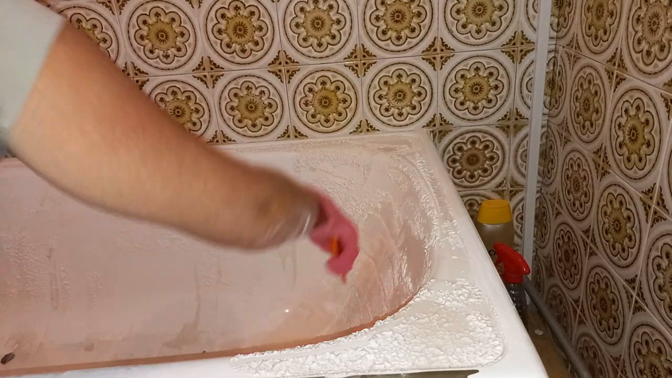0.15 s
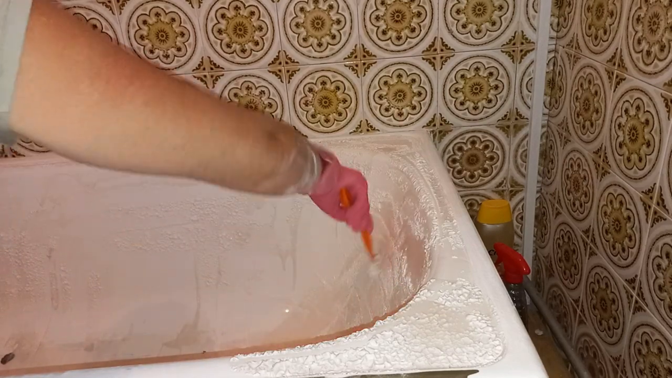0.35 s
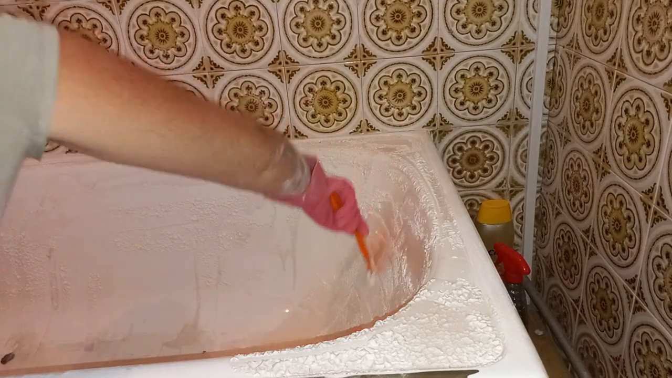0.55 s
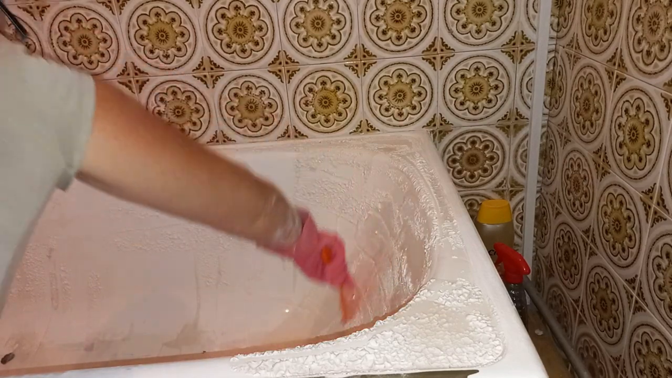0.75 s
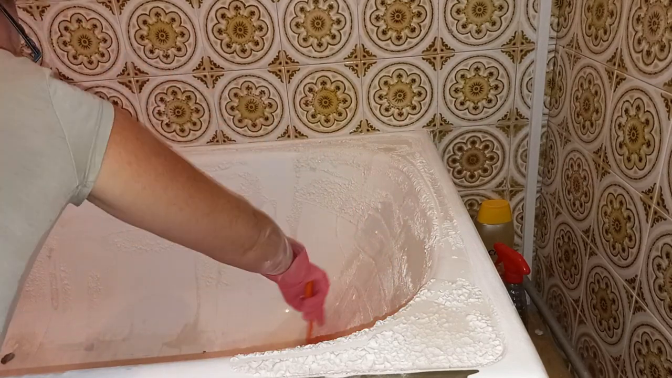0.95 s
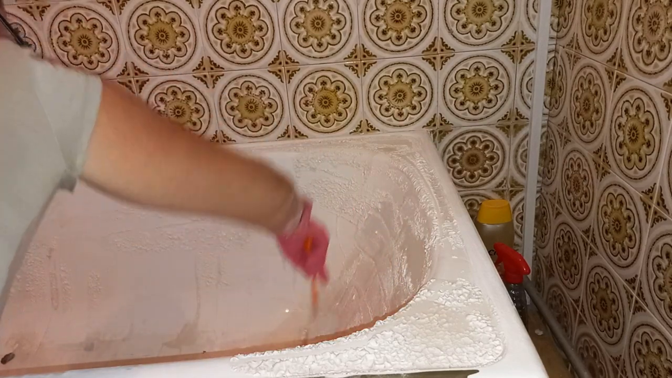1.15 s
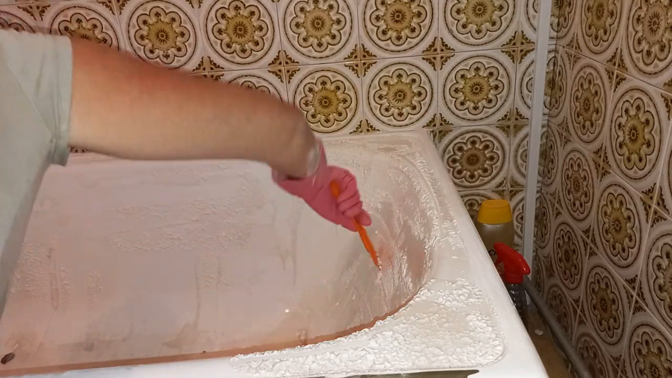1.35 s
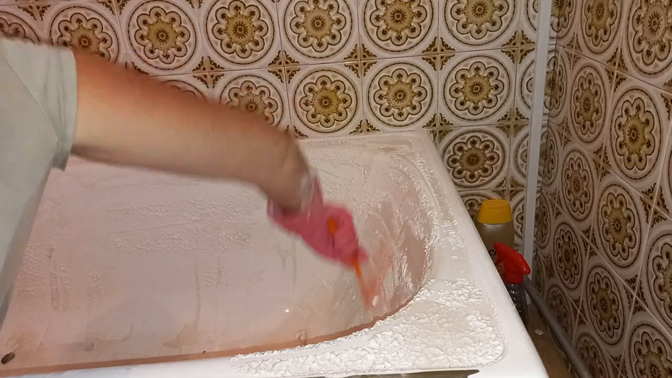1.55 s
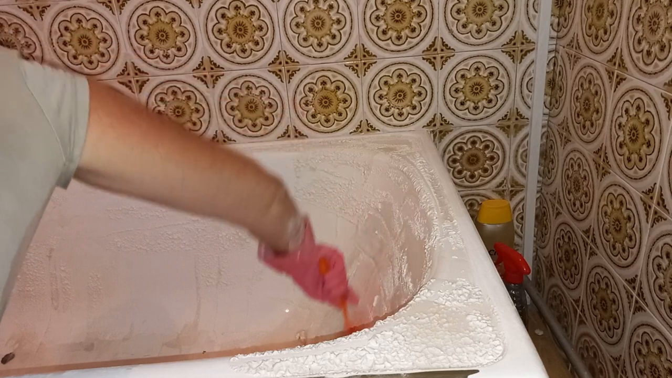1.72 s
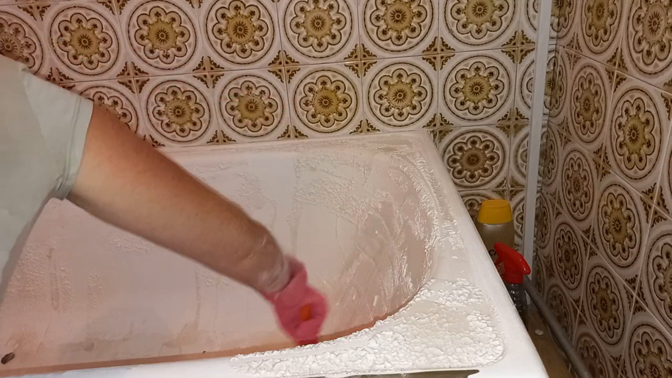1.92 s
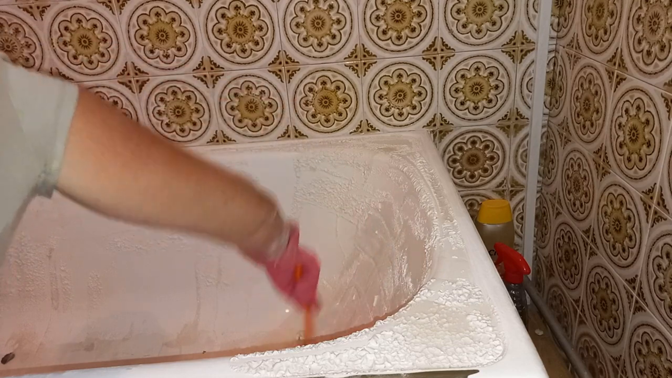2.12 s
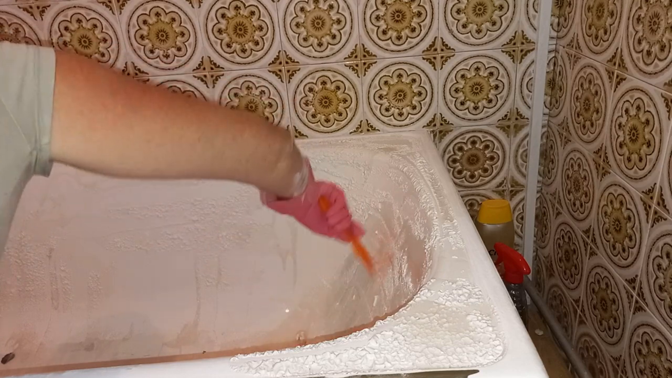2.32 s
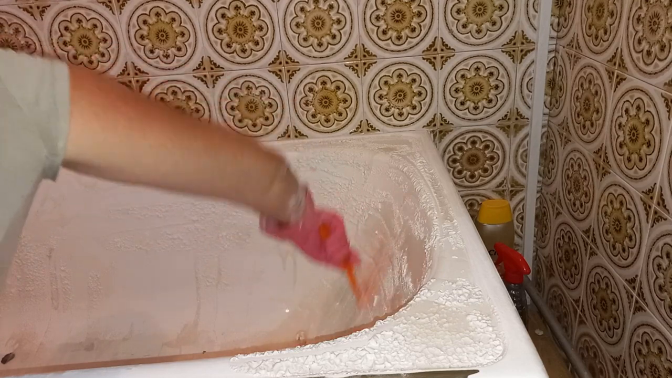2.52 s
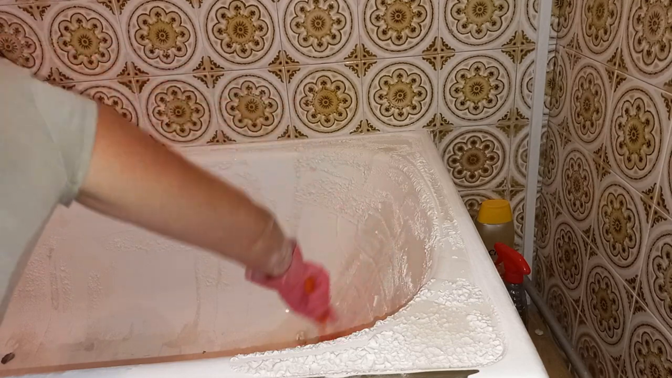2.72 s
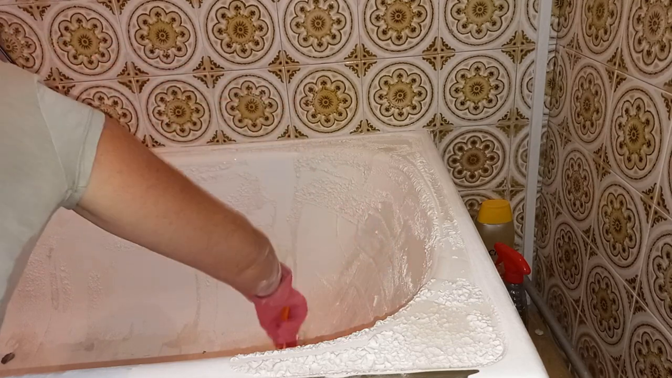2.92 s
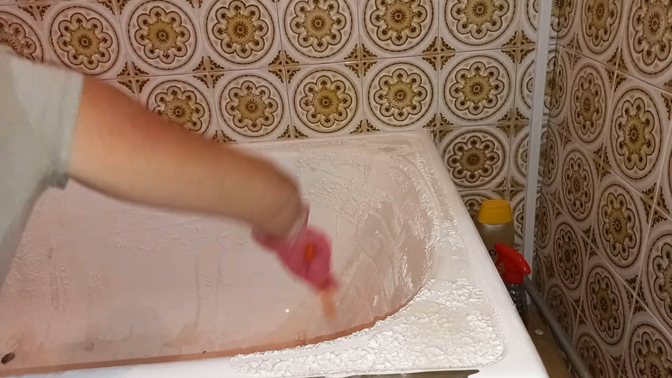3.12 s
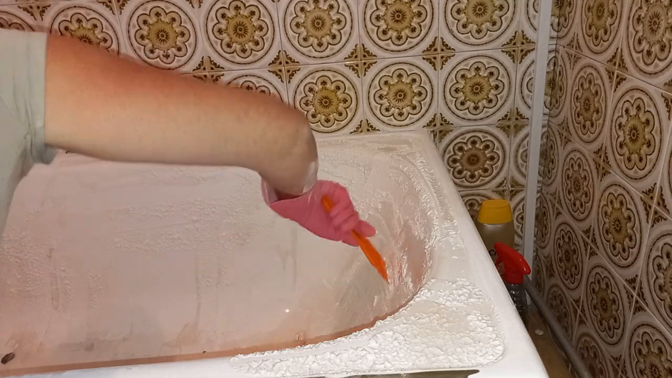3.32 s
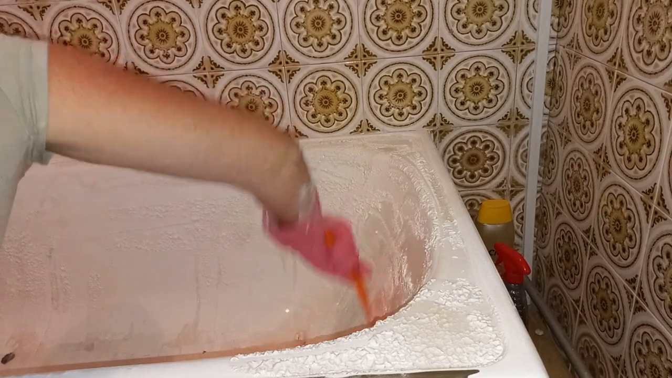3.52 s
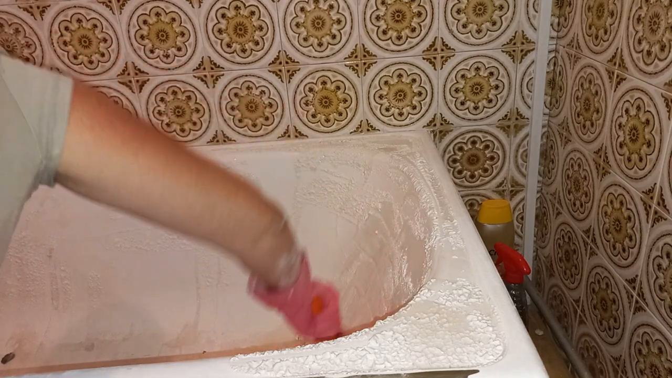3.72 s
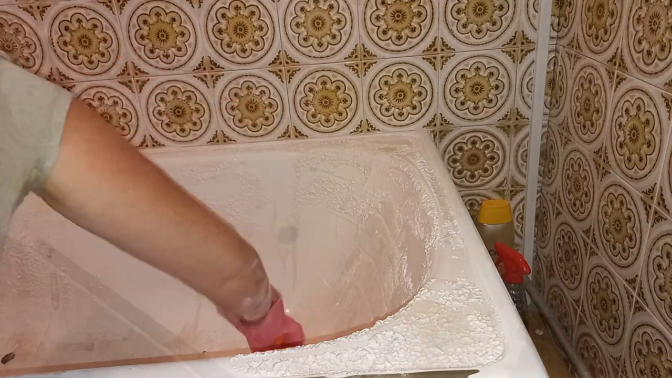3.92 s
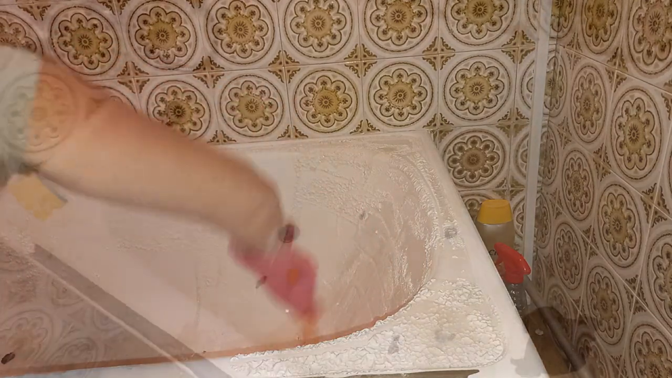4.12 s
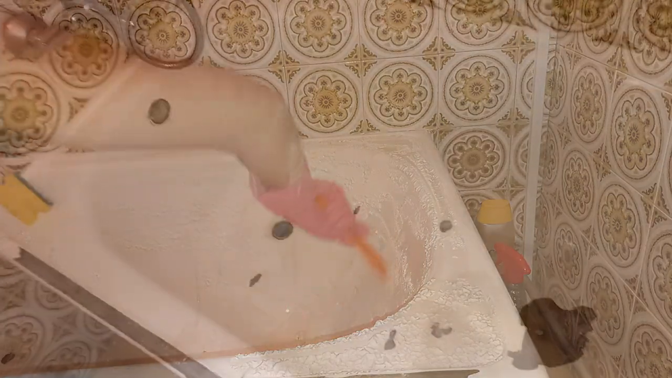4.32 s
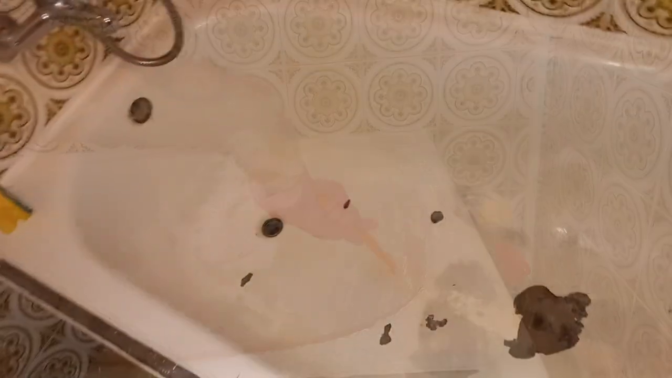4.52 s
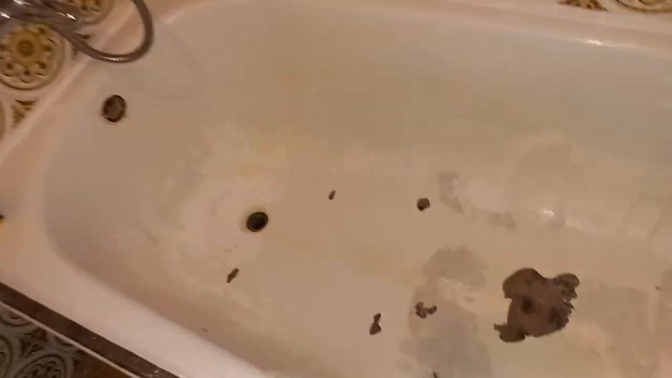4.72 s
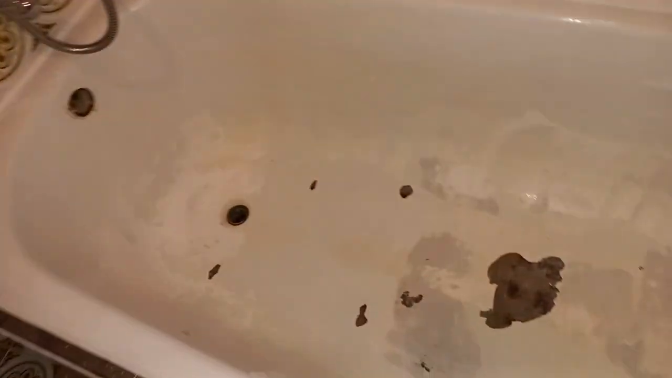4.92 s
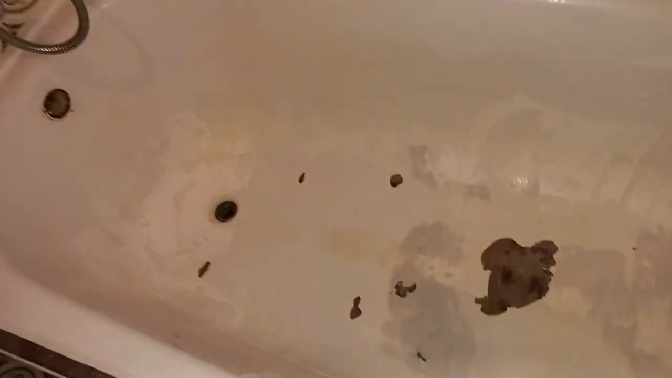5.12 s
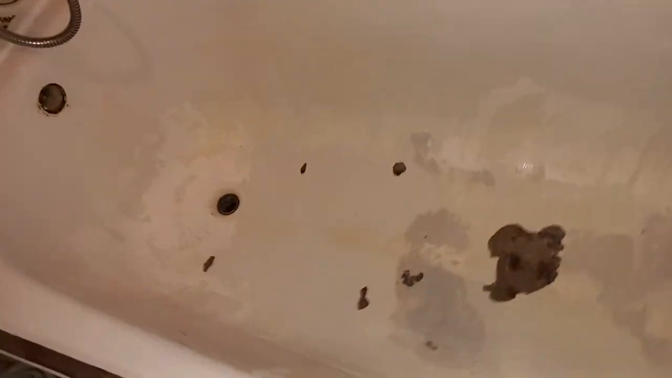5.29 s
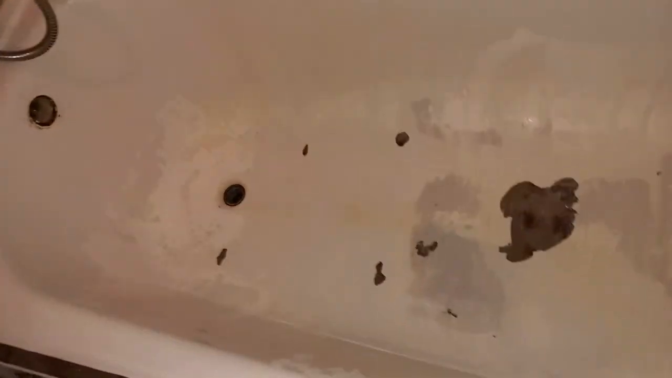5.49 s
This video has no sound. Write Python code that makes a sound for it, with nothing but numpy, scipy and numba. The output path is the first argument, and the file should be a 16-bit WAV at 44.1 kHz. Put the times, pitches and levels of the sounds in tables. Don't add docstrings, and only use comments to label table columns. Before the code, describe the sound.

Close, dry scraping of a blade on an enamelled metal tub in a small tiled bathroom. A stroke already under way fades at once, then five more follow at roughly one-second intervals, each starting with a hollow knock and thinning as the blade lifts. Gaps are nearly silent, with faint brushes. A loud bang comes just before the last stroke, which is still going at the cut. Mono phone microphone, faint hiss.

```python
import sys
import numpy as np
from scipy import signal
from scipy.fft import rfft, irfft
from scipy.io import wavfile
from scipy.ndimage import uniform_filter1d
from numba import njit

SR = 44100
rng = np.random.default_rng(int(sys.argv[2]) if len(sys.argv) > 2 else 0)


def gain_from_db(level_db):
    decades = np.asarray(level_db, float) / 20
    return 10 ** decades


def generate_wav(sig):
    pcm = np.round(np.clip(np.atleast_2d(sig).T, -1, 1) * 32767).astype(np.int16)
    wavfile.write(sys.argv[1], SR, pcm)


N = 244755
USUAL_DB = -30
TAIL = 16384


def unit(x):
    return x / np.sqrt(np.mean(x ** 2))


def on_log(hz, table):
    f, v = np.transpose(table)
    return np.interp(np.log(hz + 1), np.log(f), v)


def colour(x, table):
    size = 4096
    hz = np.arange(size // 2 + 1) * SR / size
    cepstrum = irfft(on_log(hz, table) * np.log(10) / 20)
    cepstrum[1:size // 2] *= 2
    cepstrum[size // 2 + 1:] = 0
    response = irfft(np.exp(rfft(cepstrum)))
    return signal.fftconvolve(x, response)[:len(x)]


@njit
def svf(x, hz, width):
    y, band, low = np.empty(len(x)), 0., 0.
    for i in range(len(x)):
        g, k = np.tan(np.pi * hz[i] / SR), width / hz[i]
        v = (band + g * (x[i] - low)) / (1 + g * (g + k))
        band, low, y[i] = 2 * v - band, low + 2 * g * v, k * v
    return y


def walk(rate):
    hold = int(SR / rate)
    steps = np.repeat(rng.standard_normal(N // 8), hold)[:N]
    return unit(uniform_filter1d(uniform_filter1d(steps, hold), hold))


def lagged(db, seconds):
    pole = np.exp(-1 / (max(seconds, .002) * SR))
    return 20 * np.log10(signal.lfilter([1 - pole], [1, -pole], gain_from_db(db)) + 1e-9)


def swells(rows):
    t = np.arange(N) / SR
    edge_db = -15.5
    return sum(gain_from_db(np.maximum(db + edge_db * ((t - s) / half) ** 2, -140)) for s, half, db in rows)


def slips(rate, scatter_db, patchy_db):
    u = rng.random((N, 2))
    size = gain_from_db(-scatter_db * np.log(u[:, 1] + 1e-9))
    clicks = (u[:, 0] < rate / SR) * size * rng.choice([-1, 1], N)
    grain = unit(clicks) + rng.standard_normal(N)
    patches_db = patchy_db * (.5 * walk(45) + walk(160))
    return unit(grain * gain_from_db(patches_db))


# frequency in Hz, density in dB per Hz.
HISS_SHAPE = [(18, -40.5), (30, -5), (1220, -8), (1350, -9), (1720, -10.5), (4300, -10.5), (6380, -8.5),
              (14000, -11.5), (16000, -11.5)]


def hiss():
    return gain_from_db(-76.5) * unit(colour(rng.standard_normal(N), HISS_SHAPE))


# frequency in Hz, width in Hz, level in dB.
BLADE_MODES = [(4400, 500, -10), (5930, 380, -4), (6700, 1500, -3), (8100, 2000, -2), (10400, 900, -14),
               (12900, 1600, -12), (14600, 900, -17)]
# middle in seconds, half length in seconds, peak in dB.
BRUSHES = [
    (1.35, 0.048, -58),
    (1.67, 0.036, -81),
    (2.32, 0.12, -71),
    (2.492, .025, -77.5),
    (2.586, 0.037, -76),
    (3.3, 0.078, -61.5),
    (3.57, .065, -76),
    (4.27, 0.073, -58.5),
]
# middle in seconds, half length in seconds, peak in dB.
PEELS = [
    (.36, .17, -77),
]
# start in seconds, peak in dB, frequency in Hz.
FLAKES = [
    (0.7003, -54.5, 3610),
    (0.729, -70, 5430),
]


def brushing():
    rub, one = slips(rate=9000, scatter_db=1.5, patchy_db=1.2), np.ones(N)

    def resonate(x, hz, width):
        return unit(svf(svf(x, hz * one, width), hz * one, width))

    sung = sum(gain_from_db(db) * resonate(rub, hz, 1.5 * width) for hz, width, db in BLADE_MODES)
    out = unit(sung) * swells(BRUSHES)
    out += resonate(rub, 3900, 900.) * swells(PEELS)
    t = np.arange(600) / SR
    for s, db, hz in FLAKES:
        i = int(s * SR)
        burst = svf(rng.standard_normal(len(t)), 1.15 * hz * one, 1700.)
        flake = svf(burst, 1.1 * hz * one, 1700.)
        out[i:i + len(t)] += gain_from_db(db) * unit(flake) * np.exp(-t / 0.0037) / 2
    return out


# start in seconds, peak in dB, contact time in ms.
KNOCKS = [(0.797, -40, 0.84), (0.923, -12.5, 0.76), (1.694, -58.5, 1.1), (1.764, -18.5, 0.85),
          (1.836, -9.5, 0.29), (2.62, -45, 1.2), (2.708, -20.5, 1.2), (2.778, -10, 1.1), (2.827, -35, 0.92),
          (3.701, -32, 1), (3.746, -29, 0.47), (3.856, -13, 2), (4.648, -51, 2.3), (4.761, -42, 0.85),
          (4.802, 3.5, 0.85), (4.808, -11, 0.48), (4.836, -7, 1.3), (5.015, -10, 1.13), (5.032, -34, 0.92),
          (5.143, -12, 0.89)]


def knocks():
    force, t = np.zeros(N), np.arange(800) / SR
    crackles = rng.standard_normal((len(KNOCKS), len(t)))
    for (s, db, ms), crackle in zip(KNOCKS, crackles):
        push = np.hanning(int(np.clip(ms, .1, 4) * SR / 1000) + 3)
        i = int(s * SR)
        force[i:i + len(push)] += gain_from_db(db + 16.0) * push / push.sum()
        force[i:i + len(t)] += gain_from_db(db - 22.0) * uniform_filter1d(crackle, size=7) * np.exp(-t / 0.0022)
    return signal.sosfilt(signal.butter(2, 220, "highpass", fs=SR, output="sos"), force)


# frequency in Hz, level in dB, T60 in seconds.
SHELL_MODES = [(197, -18.5, 0.81), (283, 0.5, 0.48), (319.8, -15, 0.27), (397.1, -6, 0.6),
               (428.8, -7, 0.37), (504, -5, 0.36), (531.3, -3.5, 0.33), (585, -18.5, 0.96), (724, -6, 0.32),
               (818.7, 0.5, 0.14), (942.6, -12, 0.71), (987, -12.5, 0.59), (1057.7, -7, 0.3),
               (1160, -13.5, 0.3), (1248, -12, 0.32), (1320, -8, 0.26), (1416, -21, 0.15), (1419, -5, 0.11),
               (1548, -6.5, 0.2), (1668, -4.5, 0.23), (1784, -3, 0.071), (1793, -7.5, 0.16),
               (2050, -12.5, 0.51), (2030, -28, 0.28), (2460, -27.5, 0.033), (2660, -18, 0.34),
               (2830, -21, 0.66),
               (76, -16, 0.072), (99, -9, 0.48), (108, -15.5, 0.38)]
# frequency in Hz, T60 in seconds.
ROOM_T60 = [(100, 0.053), (500, 0.16), (2000, 0.28), (6000, 0.097), (14000, 0.037)]
# frequency in Hz, density in dB per Hz.
SCRAPE_SHAPE = [(32, -39.5), (55, -16.5), (86, 3.5), (223, -16), (270, 3.5), (385, 5), (649, -4.5),
                (804, -5.5), (1320, -7), (4040, -10), (5500, -17), (7140, -14), (9950, -29.5),
                (14600, -31.5), (16000, -29)]


def tub(ring_db, room_db):
    t = np.arange(TAIL) / SR
    damping = 0.38
    modes = SHELL_MODES
    ring = np.zeros(TAIL)
    for (hz, db, t60), (louder, sharper) in zip(modes, rng.standard_normal((len(modes), 2))):
        tone = np.sin(2 * np.pi * hz * (1 + .012 * sharper) * t)
        ring += gain_from_db(db + 1.3 * louder) * tone * 1000 ** (-t / max(t60 * damping, .02))
    f, s, z = signal.stft(rng.standard_normal(TAIL), SR, nperseg=256)
    decay = 1000 ** (-s / np.maximum(on_log(f, ROOM_T60), .02)[:, None])
    tail = signal.istft(z * decay, SR)[1][:TAIL]
    tail *= gain_from_db(room_db) * np.clip(t / 0.0016, 0, 1) / np.sqrt(np.sum(tail ** 2))
    tail[0] += 1
    return colour(tail, SCRAPE_SHAPE) + gain_from_db(ring_db) * ring


# time in seconds, load in dB, speed from 0 to 1.
FIRST = [
    (0.0, -27.5, 0.87),
    (0.094, -26, 0.86),
    (0.138, -30, 0.8),
    (0.154, -35, 0.84),
    (0.273, -56, 0.65),
    (0.299, -65, 0.56),
]
SECOND = [
    (0.856, -25, .6),
    (.875, -37, .72),
    (.915, -34, .7),
    (.93, -26.5, .72),
    (1.0, -28, .6),
    (1.074, -24, 0.87),
    (1.125, -33, 0.79),
    (1.2, -29, 1),
    (1.348, -69, 0.41),
]
THIRD = [
    (1.839, -16.5, 0.86),
    (1.977, -22, 0.81),
    (1.996, -23, 0.89),
    (2.019, -22, 1.0),
    (2.183, -35, 0.81),
    (2.209, -30.5, 0.87),
    (2.333, -64, 0.34),
    (2.357, -70, 0.4),
]
FOURTH = [
    (2.777, -18.5, 0.63),
    (2.819, -23, 0.59),
    (2.895, -17.5, 0.87),
    (2.924, -20, 0.79),
    (3.021, -22.5, 0.94),
    (3.085, -32, .87),
    (3.11, -30, 0.85),
    (3.179, -46.5, 0.7),
    (3.27, -78, .8),
]
LANDING = [
    (3.68, -41.5, 0.0),
    (3.699, -28.5, 0),
    (3.732, -18, 0.43),
    (3.747, -15, .56),
    (3.8, -25.5, 0.61),
    (3.852, -17.5, 0.81),
]
FIFTH = [
    (3.856, -16.5, 0.91),
    (3.899, -22.5, 0.78),
    (3.934, -18, 0.97),
    (4.018, -25.5, 0.99),
    (4.064, -20, 1.1),
    (4.123, -24.5, .97),
    (4.169, -31.5, 0.83),
    (4.282, -68, 0.79),
    (4.318, -69, 0.28),
]
BUMP = [
    (4.788, -18, .05),
    (4.802, -7.5, 0.057),
    (4.829, -18.5, 0.28),
    (4.866, -27.5, .3),
    (4.93, -34.5, .04),
    (4.986, -49, 0.0),
    (5.0, -44, 0.07),
]
SIXTH = [
    (5.002, -31.5, 0.0),
    (5.032, -20.5, 0.44),
    (5.096, -27.5, .62),
    (5.145, -19, 0.6),
    (5.19, -24.5, 0.74),
    (5.26, -20, 0.85),
    (5.39, -25, 0.87),
    (5.46, -22.5, 1.11),
    (5.55, -20.5, 1.1),
]
# arm's weight in dB, handle in Hz on landing, blade in Hz at full speed.
GRIPS = [
    (-58, 720, 1160),
    (-38.5, 620, 1560),
    (-43.5, 620, 1284),
    (-42, 730, 1530),
    (-44.5, 510, 1600),
    (-43, 310, 1500),
    (-44.5, 500, 1700),
    (-44, 550, 1500),
]
# start in seconds, length in seconds, first load in dB,
# last load in dB, speed from 0 to 1.
TOUCHES = [
    (0.699, 0.065, -75, -70.5, 0.2),
    (0.79, 0.072, -62, -40, 0.7),
    (1.613, .074, -61, -70, 0.1),
    (1.691, 0.093, -49.5, -60, 0),
    (1.753, .084, -35.5, -24, .62),
    (2.617, 0.088, -50.5, -57, 0.3),
    (2.692, 0.09, -32.5, -31.5, 0.32),
    (3.589, 0.1, -59.5, -51.5, .05),
    (4.643, 0.13, -53.5, -65.5, 0.1),
    (4.756, .031, -27.5, -27.5, 0.1),
]
# constant in dB, dB per speed, dB per speed squared.
SHELL_LAW = (-0.84, 3.9, -18.5)
CHATTER_LAW = (-14.5, 31.56, -18.5)
GRIT_LAW = (-42.5, 68.6, -29)


def hand():
    touch_hz, loaded_hz, settles_s, rest_hz = 445, 317, .12, 824
    lift_s, lift_db = 0.027, -27
    weight_per_load, lean_db_s = 0.52, 15
    lifted_db, lift_weight_per_load = -52.5, 0.73
    bites_db, speedup = -50, 3.8
    t = np.arange(N) / SR
    load, weight, speed = np.full(N, -140.), np.full(N, -140.), np.zeros(N)
    handle, blade = np.full(N, 1. * touch_hz), np.full(N, 1400.)
    padded = np.zeros(N)
    strokes = FIRST, SECOND, THIRD, FOURTH, LANDING, FIFTH, BUMP, SIXTH
    for rows, (weight_db, handle_hz, blade_hz) in zip(strokes, GRIPS):
        end_s, end_db, end_speed = rows[-1]
        s, db, v = np.transpose(rows + [(end_s + lift_s, end_db + lift_db, end_speed)])
        handle[(t >= s[0] - .25) & (t < s[0]) & (speed == 0)] = handle_hz
        on = (t >= s[0]) & (t < s[-1])
        load[on], speed[on] = np.interp(t[on], s, db), np.interp(t[on], s, v)
        blade[on] = blade_hz
        weight[on] = weight_db + weight_per_load * (load[on] - USUAL_DB) + lean_db_s * (t[on] - s[0] - .2)
        weight[on] += lift_weight_per_load * np.minimum(load[on] - lifted_db, 0)
        handle[on] = loaded_hz + (handle_hz - loaded_hz) * np.exp((s[0] - t[on]) / settles_s)
    for s, length, first_db, last_db, v in TOUCHES:
        on = (t >= s) & (t < s + length)
        load[on] = first_db + (last_db - first_db) * (t[on] - s) / length
        speed[on] = v
        padded[on] = -3.5
        if last_db > bites_db:
            speed[on] += speedup * (t[on] - s - length / 2)
            weight[on] = -41.5 + .8 * (load[on] - USUAL_DB)
    speed = np.clip(speed, 0, 1.3)
    laws = SHELL_LAW, CHATTER_LAW, GRIT_LAW
    shell, chatter, grit = (load + a + b * speed + c * speed ** 2 for a, b, c in laws)
    boom = lagged(weight, 0.0038)
    chatter = chatter + padded * (speed < .15)
    blade = rest_hz + (blade - rest_hz) * speed ** 2
    return boom, shell, chatter, grit + padded, handle, blade


EDGES_HZ = [50, 200, 750, 2300, 5000, 19000]
# frequency in Hz, gain in dB.
MICROPHONE = [(40, -19.5), (58, -10.5), (70, -1.5), (7800, 3), (8900, 6), (9700, 0.5), (11500, -0.5),
              (14800, 6), (15700, -2)]


def scraper():
    spots = [colour(tub(ring_db=-42.0, room_db=-10.0), MICROPHONE) for _ in range(7)]
    power = np.mean(np.abs(rfft(spots)) ** 2, axis=0)
    boom_db, shell_db, chatter_db, grit_db, handle_hz, blade_hz = hand()
    sizzle_db = grit_db - 2.5 + 0.36 * np.clip(grit_db - chatter_db, -25, 4)
    sizzle_db -= 0.13 * np.clip(grit_db - USUAL_DB, -12, 15)
    slow_db = np.minimum(sizzle_db, lagged(sizzle_db, 0.031) + 1.5)
    sizzle_db = np.where(np.arange(N) < SR / 10, sizzle_db, slow_db)
    force = np.zeros(N)
    # level dB, resonance Hz, its width Hz, rise time in samples
    bands = ((boom_db, None, 0, 1),
             (shell_db, handle_hz, 130., 1),
             (chatter_db, blade_hz, 280., 1),
             (grit_db - 1.5, None, 0, 150),
             (sizzle_db, None, 0, 400))
    for k, (db, hz, width, rise) in enumerate(bands):
        band = signal.butter(3, EDGES_HZ[k:k + 2], "bandpass", fs=SR, output="sos")
        rub = slips(rate=6000, scatter_db=2.0, patchy_db=1.5)
        if width:
            pitch = np.clip(hz * (1 + .04 * walk(30)), 150, 3000)
            rub = .95 * rub + 2.2 * svf(rub, pitch, width)
        if k < 2:
            rub = signal.sosfilt(band, rub)
            rub /= uniform_filter1d(rub ** 2, size=1500) ** .35
        steady = np.abs(rfft(signal.sosfilt(band, rub), 1 << 18)) ** 2
        bins = np.linspace(0, len(power) - 1, len(steady))
        gain = np.interp(bins, np.arange(len(power)), power)
        heard = np.sqrt(2 * np.mean(steady * gain) / N)
        force += signal.sosfilt(band, rub * uniform_filter1d(gain_from_db(db), rise)) / heard
    force += knocks()
    share = np.array([walk(14) for _ in spots])
    share /= np.sqrt(np.sum(share ** 2, axis=0))
    direct = colour(colour(np.eye(1, TAIL)[0], SCRAPE_SHAPE), MICROPHONE)
    out = signal.fftconvolve(force, direct)[:N]
    for w, response in zip(share, spots):
        out += signal.fftconvolve(force * w, response - direct)[:N]
    return out


def scene():
    return np.tile(hiss() + brushing() + scraper(), (2, 1))


def band_limit(x):
    return signal.sosfilt(signal.butter(12, 16370, fs=SR, output="sos"), x)


def record(dry):
    top = signal.ellip(10, .2, 60, 15750, fs=SR, output="sos")
    rounded = np.tanh(0.71 * dry) / 0.5
    mix = signal.sosfilt(top, rounded) - .0004
    return band_limit(mix)


dry = scene()
out = record(dry)
generate_wav(out)
```